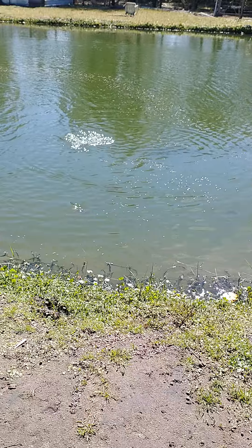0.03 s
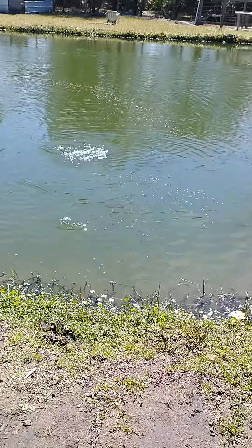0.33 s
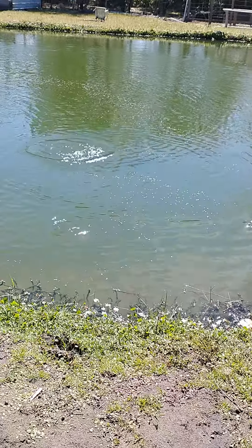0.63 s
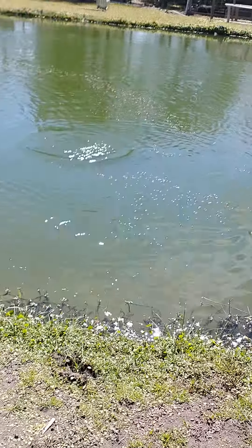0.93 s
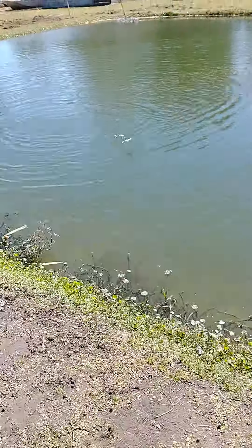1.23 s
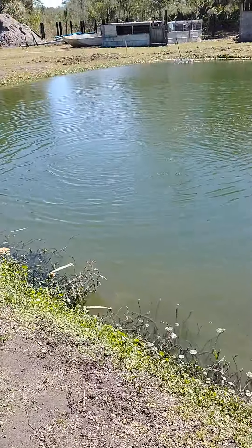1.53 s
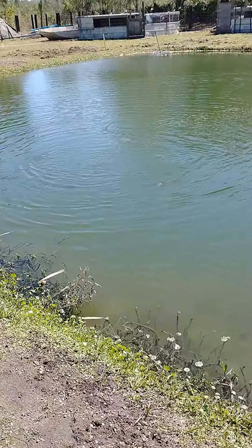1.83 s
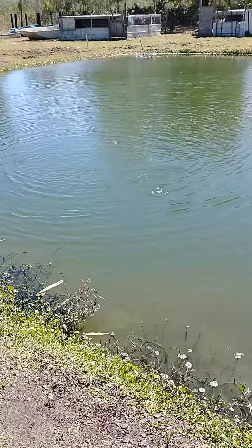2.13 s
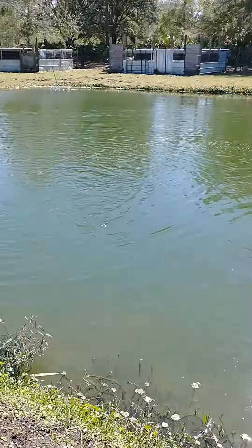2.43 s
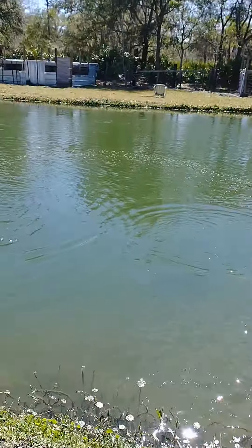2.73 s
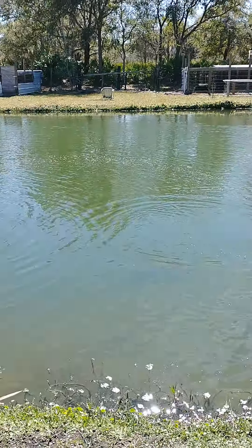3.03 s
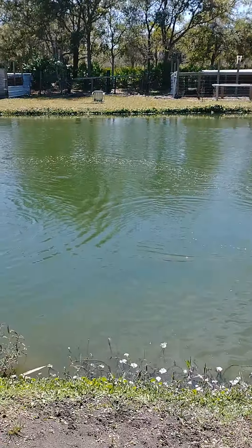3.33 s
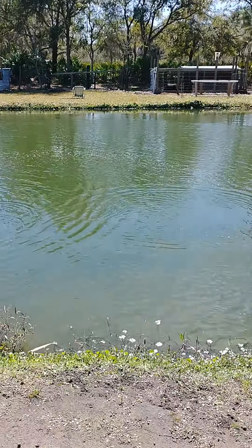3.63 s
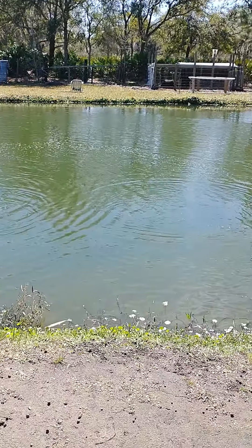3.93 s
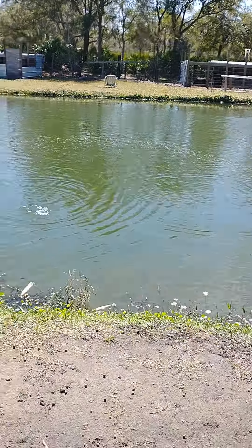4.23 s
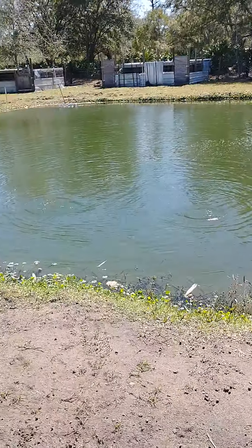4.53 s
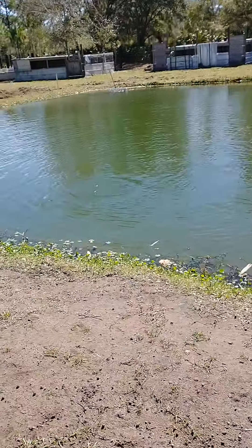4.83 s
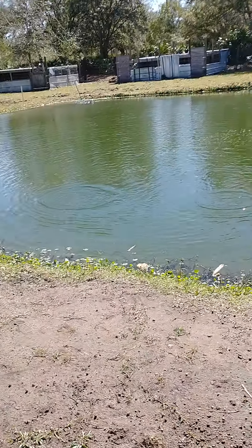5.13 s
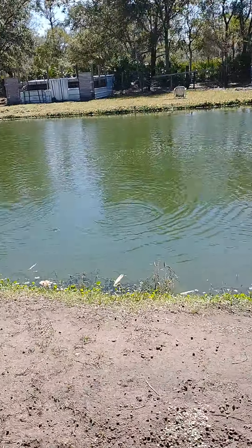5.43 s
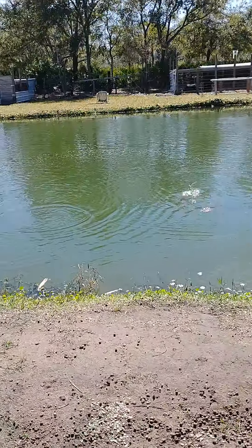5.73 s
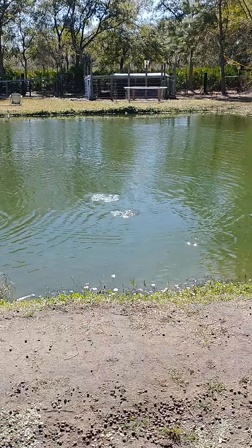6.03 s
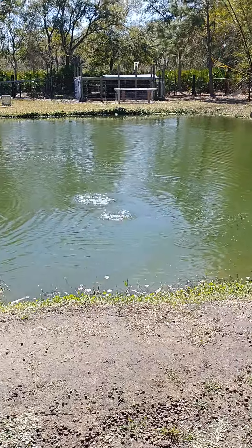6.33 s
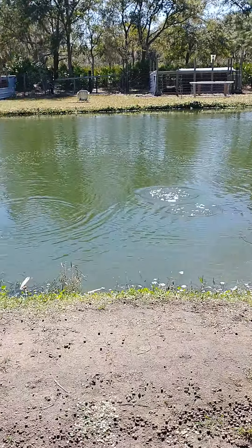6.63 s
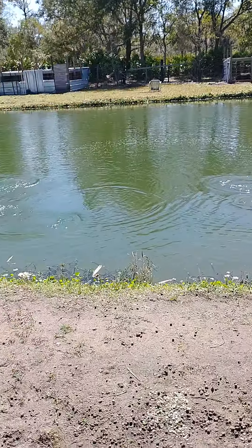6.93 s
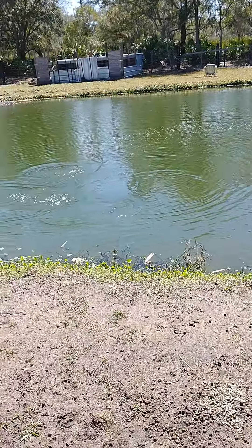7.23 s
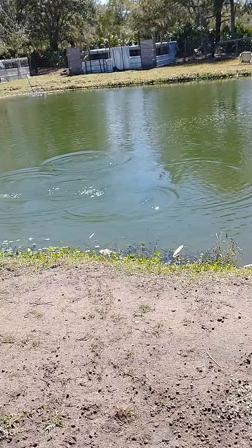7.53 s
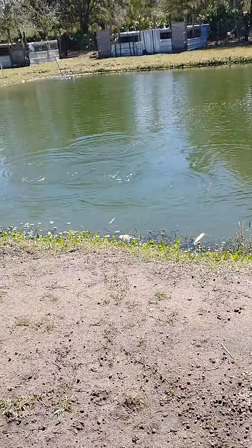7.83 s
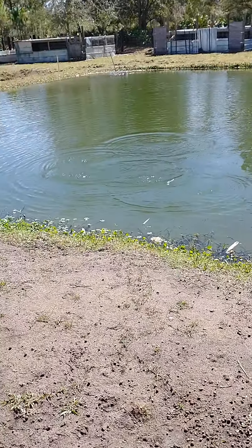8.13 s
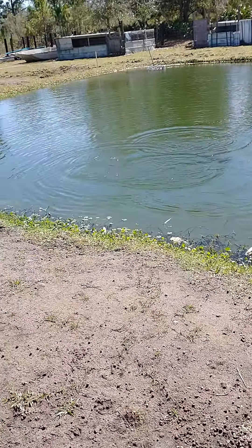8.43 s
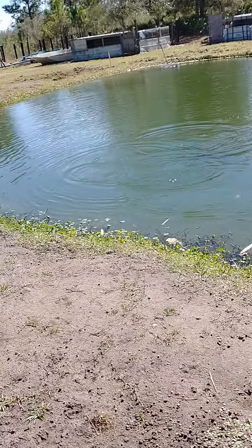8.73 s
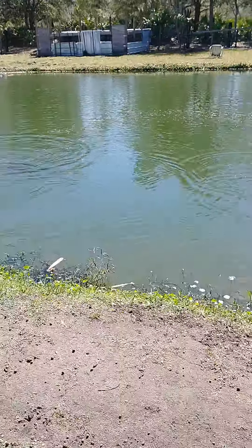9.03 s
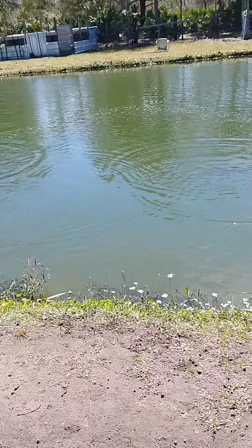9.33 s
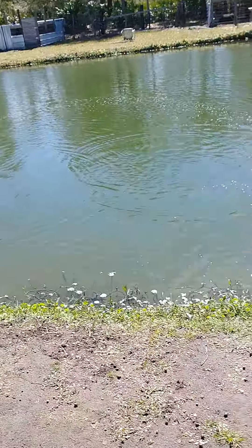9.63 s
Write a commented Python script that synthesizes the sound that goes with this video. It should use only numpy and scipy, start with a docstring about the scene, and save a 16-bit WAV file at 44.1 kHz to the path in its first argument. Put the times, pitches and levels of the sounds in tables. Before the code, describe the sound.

A finger bumps the microphone over low breeze rumble and a fading faraway truck, while feeding fish softly plop in a pond.

```python
"""Feeding fish, heard from the bank of a pond on a stereo microphone. From the start a diesel truck drones
on a distant road, beating against a far pump, under traffic roar and a light breeze. Fish and pellets splash.
Close by, something like keys clinks, a twig snaps and shoes scuff; wind thumps the microphone, and at 1.2 s
a finger knocks and slides over its left port. From 2 s tyres sing as cars go by and the slowing truck fades.
Faint insects come up, and the fish feed most busily around 5.7 s."""
import sys
import numpy as np
from scipy import signal
from scipy.fft import rfft, irfft
from scipy.io import wavfile
from scipy.ndimage import uniform_filter1d

SR = 44100
rng = np.random.default_rng(int(sys.argv[2]) if len(sys.argv) > 2 else 0)


def master_out(mix):
    """Clip the mix to full scale and print it as 16-bit PCM to the path in sys.argv[1]."""
    frames = np.transpose(np.atleast_2d(mix))
    ceiling = np.clip(frames, -1, 1)
    pcm = np.round(ceiling * 32767).astype(np.int16)
    wavfile.write(sys.argv[1], SR, pcm)


N = 426888
T = np.arange(N) / SR
BAND_LIMIT_HZ = 15900


def gain_of(db):
    """Decibels to amplitude."""
    return 10 ** (np.asarray(db) / 20)


def unit_rms(x):
    """Scales to rms 1."""
    return x / np.sqrt(np.mean(x ** 2) + 1e-20)


def at_hz(points, hz):
    """A spectrum's value at hz, on a log-frequency axis."""
    f, value = np.transpose(points)
    return np.interp(np.log(hz + 1), np.log(f), value)


def follow(rows, t=T):
    """Each column of a curve at the times t."""
    s, *columns = np.transpose(rows)
    return [np.interp(t, s, c) for c in columns]


def place(mix, start_s, sound, left_db):
    """Adds a sound to the mix, left_db louder on the left than on the right."""
    part = mix[:, round(start_s * SR):][:, :sound.shape[-1]]
    part += (sound * gain_of([[left_db / 2], [-left_db / 2]]))[:, :part.shape[1]]


def drift(rate_hz):
    """Slow random wandering of rms 1."""
    f = np.fft.rfftfreq(N, 1 / SR)
    return unit_rms(irfft(rfft(rng.standard_normal(N)) * np.exp(-(f / rate_hz) ** 2), N))


def coloured(x, spectrum):
    """Gives x a spectrum, at rms 1."""
    size = x.shape[-1]
    return unit_rms(irfft(rfft(x) * gain_of(at_hz(spectrum, np.fft.rfftfreq(size, 1 / SR))), size))


# How alike open air sounds at the microphone's two ports: freq_hz, likeness_ratio
PORT_LIKENESS = [(60, 1), (290, 0.88), (640, 0.73), (1400, 0.46), (3100, 0), (16000, 0)]
# How much louder it is at the left port: freq_hz, left_db
PORT_BALANCE = [(60, .6), (200, 1.5), (700, 1), (1300, 3), (4000, 1.5), (15000, 1.8)]

def diffuse_noise(shape_db, patchy_db, size=1024):
    """Noise from all around the microphone, rms 1, with drifting patches; its spectrum is shape_db(t, hz)."""
    hop = size // 4
    t, hz = np.arange(N // hop + 5)[:, None] * hop / SR, np.fft.rfftfreq(size, 1 / SR)
    a, b, c, d, patches = rng.standard_normal((5, len(t), len(hz)))
    likeness = np.clip(at_hz(PORT_LIKENESS, hz), -1, 1)
    left = a + 1j * b
    right = likeness * left + np.sqrt(1 - likeness ** 2) * (c + 1j * d)
    shape = gain_of(shape_db(t, hz) + np.zeros_like(t))
    shape /= np.linalg.norm(shape, axis=1, keepdims=True)
    patches = unit_rms(uniform_filter1d(uniform_filter1d(patches, size=8, axis=0), size=8, axis=1))
    lean = gain_of(at_hz(PORT_BALANCE, hz) / 2)
    spectra = np.array([left * lean, right / lean]) * shape * gain_of(patchy_db * patches)
    return unit_rms(signal.istft(spectra.swapaxes(1, 2), nperseg=size, noverlap=size - hop)[1][:, :N])


def engine_tones(turns, orders, waver):
    """Multiples of an engine's cycle, each fading in and out on its way to the microphone."""
    out = np.zeros(N)
    for order, db in orders:
        path = 1 + waver * (drift(2) + 1j * drift(2.4))
        out += gain_of(db) * (path * np.exp(2j * np.pi * (round(order) * turns + rng.random()))).real
    return out


# The truck slowing; once below the pump's tone, it beats ever faster against it: time_s, firing_hz
TRUCK_FIRING = [(0.0, 72.19), (1.3, 70.86), (2.3, 70.34), (3.4, 69.11), (4.2, 68.6), (4.9, 66.25),
                (6.1, 66.21), (7.1, 63.83), (7.7, 63.82), (8.5, 62.45), (9.68, 61.97)]
# Its drone as it reaches the bank: time_s, level_db
TRUCK_LEVEL = [(0, -30), (.4, -36), (.7, -40.5), (1.1, -36), (1.3, -40.5), (1.65, -34.5), (1.95, -45.5),
               (2.25, -42.5), (2.6, -53.5), (2.8, -43), (3.05, -49), (3.6, -43), (4.3, -45.5), (5, -60),
               (6, -58.5), (7.5, -59), (8.5, -59.5), (9.68, -71)]
# Its overtones: cycle_multiple, relative_db
TRUCK_OVERTONES = [(9, -12.5), (12, -14), (16, -23.5), (18, -20.5)]

def truck(cylinders=6, overtones_db=2, port_skew_rad=.087, waver_db=.83):
    """A diesel on the distant road: a wavering firing tone, a little out of step between the ports."""
    cycles = np.cumsum(follow(TRUCK_FIRING)[0]) / SR / cylinders
    skew = port_skew_rad * drift(3) * np.array([[1], [-1]])
    drone = np.sqrt(2) * np.sin(2 * np.pi * cylinders * cycles + skew)
    sound = drone + gain_of(overtones_db) * engine_tones(cycles, TRUCK_OVERTONES, waver=.26)
    return sound * gain_of(follow(TRUCK_LEVEL)[0] + waver_db * drift(4.1)) * gain_of([[.3], [-.3]])


# The pump engine's steady running: time_s, shaft_hz
PUMP_SHAFT = [(0.0, 23.229), (4.2, 22.943), (5.2, 22.949), (6.5, 23.049), (8.0, 22.928), (9.68, 22.969)]
# Its overtones: shaft_multiple, relative_db
PUMP_OVERTONES = [(8, -12), (9, -4.5), (10, -7), (11, -2.5), (12, -3), (13, 0.5), (14, 1), (15, -3),
                  (16, -11.5), (17, -6), (21, -7)]
# Those overtones together, from across the water: time_s, level_db
PUMP_OVERTONE_LEVEL = [(.25, -45.5), (1.8, -53.5), (2.8, -58.5), (3.4, -61.5), (4.2, -49.5), (5.2, -62.5),
                       (7, -60.5), (9.68, -61)]

def pump(firings_per_turn=3, firing_db=-59.5, fade_db_per_s=.6, waver_db=1):
    """An engine far beyond the pond: a slowly fading firing tone under a comb of low overtones."""
    turns = np.cumsum(follow(PUMP_SHAFT)[0]) / SR
    comb = unit_rms(engine_tones(turns, PUMP_OVERTONES, waver=.3))
    comb *= gain_of(follow(PUMP_OVERTONE_LEVEL)[0])
    firing = np.sqrt(2) * np.sin(2 * np.pi * firings_per_turn * turns)
    firing *= gain_of(firing_db - fade_db_per_s * T + waver_db * drift(1.8))
    return (firing + comb) * gain_of([[.5], [-.5]])


# The traffic's roar as it reaches the bank: time_s, level_db
ROAR_LEVEL = [(.25, -43), (1.5, -42), (1.9, -43.5), (2.2, -48), (3.2, -52.5), (3.7, -51), (4.1, -49),
              (4.7, -49.5), (5.4, -56), (6.7, -51.5), (7.3, -53.5), (8, -56), (8.9, -54), (9.68, -58.5)]
# Its spectrum at that distance: freq_hz, relative_db
ROAR_SPECTRUM = [(150, -38), (300, -0.5), (420, -1), (700, 2.5), (1000, -0.5), (1400, -6.5), (2000, -14.5),
                 (2800, -22.5), (3400, -37), (6000, -52.5), (12000, -59)]

def road(pulse_depth=.12, flutter_db=.32):
    """Distant roar and tyre song, pulsing with the truck's firing and fluttering in the moving air."""
    roar = diffuse_noise(lambda t, hz: at_hz(ROAR_SPECTRUM, hz), patchy_db=1.4)
    traffic = roar * gain_of(follow(ROAR_LEVEL)[0]) + tyres()
    pulse = 1 + pulse_depth * np.sin(2 * np.pi * np.cumsum(follow(TRUCK_FIRING)[0]) / SR)
    return traffic * pulse * gain_of(flutter_db * drift(25))


# Low rumble of wind and road at the bank: time_s, level_db
RUMBLE_LEVEL = [(.3, -37.5), (.55, -38.5), (.8, -42), (1.15, -38), (1.5, -46), (1.75, -40.5), (2.5, -48),
                (3.45, -49), (3.95, -45), (4.7, -45), (5.2, -50.5), (5.7, -54), (6.7, -54), (7.5, -56),
                (8.7, -58.5), (9.68, -61)]
# Its spectrum: freq_hz, relative_db
RUMBLE_SPECTRUM = [(20, -31.5), (40, -19), (60, -10), (100, 3), (140, -4.5), (200, -3.5), (260, -8.5),
                   (320, -5.5), (400, -17.5), (600, -30.5), (1200, -61)]

def rumble(trim_db=-2, gust_db=1.15):
    """Wind and road rumble around the microphone in quick, shallow gusts."""
    noise = diffuse_noise(lambda t, hz: at_hz(RUMBLE_SPECTRUM, hz), patchy_db=.5, size=2048)
    return noise * gain_of(follow(RUMBLE_LEVEL)[0] + trim_db + gust_db * drift(rate_hz=7))


# Airy hiss of grass and leaves around the pond: time_s, level_db
LEAVES_LEVEL = [(.25, -64), (1.1, -61.5), (1.8, -66.5), (2.2, -70.5), (4.5, -73.5), (6.6, -74), (7.7, -75),
                (9.68, -73)]
# Its spectrum: freq_hz, relative_db
LEAVES_SPECTRUM = [(1000, -18), (2500, 5), (3400, 1.5), (5200, -0.5), (6300, -2), (8000, -4.5),
                   (10000, -7.5), (13000, -9.5), (16000, -14)]

def leaves(dulling=.66, calm_db=-71):
    """Grass and leaves hiss, louder early on while the truck's roar is near; the extra hiss lies mostly below
    the top octave."""
    def shape_db(t, hz):
        swell_db = np.maximum(follow(LEAVES_LEVEL, t)[0] - calm_db, 0)
        return at_hz(LEAVES_SPECTRUM, hz) - dulling * swell_db * np.log2(np.maximum(hz / 8000, 1))
    return diffuse_noise(shape_db, patchy_db=2.8, size=512) * gain_of(follow(LEAVES_LEVEL)[0])


def bubble(age, hz, ring_cycles):
    """A pocket of air that swells in about a cycle and rings down."""
    turns = hz * np.maximum(age, 0)
    return np.sin(2 * np.pi * turns) * (1 - np.exp(-turns)) ** 2 * np.exp(-turns / ring_cycles)


def splash(length_s, centre_hz, drops_per_s=450, pitch_spread=.31, spray_gain=.7):
    """A slap of spray, and a cluster of droplets that each ring for a few cycles."""
    t = T[:SR // 6]
    count = 2 + int(drops_per_s * length_s)
    delay = length_s * (np.arange(count) + rng.random(count)) / count
    size = rng.uniform(.33, 1, count)
    hz = np.minimum(centre_hz * np.exp(pitch_spread * rng.standard_normal(count)), BAND_LIMIT_HZ)
    port_gains = size * np.exp(-delay / length_s) * rng.uniform(.37, 1, (2, count))
    drops = port_gains @ bubble(t - (delay - delay[0])[:, None], hz[:, None], ring_cycles=4.5)
    spectrum = [(centre_hz * ratio, db) for ratio, db in [(1 / 6, -22), (.5, -3), (1, 0), (1.7, -9), (3, -26)]]
    spray = coloured(rng.standard_normal((2, len(t))), spectrum) * np.exp(-t / length_s)
    return unit_rms(unit_rms(drops) + spray_gain * unit_rms(spray)) * np.sqrt(length_s / t[-1])


def patter(middle_s, span_s, db, length_s, count, low_hz=3300, range_hz=1900, width_db=6):
    """Tiny splashes scattered left and right over the water, at random times."""
    out = np.zeros((2, N))
    for when, softness, pitch, side in rng.random((count, 4)):
        start_s = max(middle_s + span_s * (when - .5), 0)
        sound = gain_of(db + .25 - softness) * splash(length_s, low_hz + range_hz * pitch)
        place(out, start_s, sound, width_db * (side - .5))
    return out


# Larger splashes of fish and pellets, off the bank: start_s, level_db, length_s, centre_hz
SPLASHES = [(0.288, -61, 0.013, 5630), (.912, -54, .025, 2700), (1.695, -66, 0.011, 4600),
            (1.815, -62.5, 0.046, 3550), (2.77, -62, 0.013, 2400), (3.684, -58, 0.0045, 3870),
            (3.885, -64, 0.0053, 3900), (5.621, -72, 0.0068, 4600), (5.775, -71.5, .01, 5000),
            (5.821, -63.5, 0.019, 5300), (6.243, -69, .022, 6050), (6.569, -68, .02, 5000),
            (6.71, -69, .022, 6140), (6.88, -67, .018, 2970), (6.905, -69, .034, 4800),
            (6.973, -66.5, .035, 5000), (7.634, -71.5, .009, 4000), (9.648, -67.5, .01, 3980)]
# Bubbles left by the larger gulps: start_s, level_db, pitch_hz
GULP_BUBBLES = [(3.795, -57, 2125), (5.822, -45, 1510), (5.826, -52, 2270), (5.835, -51, 2004),
                (5.926, -50.5, 1746), (6.088, -52, 2060), (6.65, -53, 2490), (6.974, -52, 2170),
                (6.984, -51, 2070), (7.017, -49.5, 2180), (8.928, -59.5, 2170), (9.38, -63, 2350)]

def feeding(splash_trim_db=-1, rise_per_s=4):
    """Fish and pellets break the water; each bubble climbs in pitch as it nears the surface."""
    out = np.zeros((2, N))
    for start_s, db, length_s, hz in SPLASHES:
        place(out, start_s, gain_of(db + splash_trim_db) * splash(length_s, hz), left_db=1.5)
    age = T[:SR // 20]
    for start_s, db, hz in GULP_BUBBLES:
        plop = bubble(age, hz * (1 + rise_per_s * age), ring_cycles=10)
        place(out, start_s, gain_of(db) * plop, left_db=0)
    return out


def bank_echoes(x, echo_db=-14, t60_s=.3, echoes_per_s=1500):
    """A sound with its thin scatter of echoes from the banks and trees."""
    t = T[:SR // 3]
    taps = rng.standard_normal((2, len(t))) * (rng.random((2, len(t))) < echoes_per_s / SR)
    taps *= gain_of(-60 * t / t60_s) * (t > .004)
    return x + gain_of(echo_db) * signal.fftconvolve(x, taps / np.linalg.norm(taps[0]), axes=1)[:, :N]


# Small metal clinking close by, to the left: start_s, level_db, tilt_db_per_octave
CLINKS = [(.542, -58, -3), (2.21, -70, 6), (2.362, -71, 3), (2.880, -64, 9), (2.948, -69, 9),
          (2.967, -68, 7), (2.979, -62.5, -0.5), (3.052, -67, 15), (3.151, -62, 5), (3.174, -46.5, -2),
          (3.998, -69, 10), (5.226, -67, 10), (6.897, -66.5, 26), (9.285, -68.5, 19), (9.323, -65, 21)]
# The metal's modes when it rings freely: pitch_hz, relative_db, t60_s
METAL_MODES = [(3075, -4.5, 0.18), (4830, -11, .05), (5720, -12, .014), (7460, -1.5, 0.13),
               (9270, -4, .035), (14340, -6, 0.059)]
# The tick of its strike: freq_hz, relative_db
TICK_SPECTRUM = [(1500, -22), (3000, -2), (4500, 4), (7000, 5), (10000, -8), (16000, -11)]

def keys(tick_db=2, tick_t60_s=.025, strike_s=.00034, free_db=-50, damping=.13):
    """Each touch ticks and rings the same metal; the further below free_db, the sooner it is damped."""
    out, t = np.zeros((2, N)), T[:SR // 4]
    for start_s, db, tilt in CLINKS:
        freedom = gain_of(damping * min(db - free_db, 0))
        ring = np.zeros((2, len(t)))
        for hz, mode_db, t60_s in METAL_MODES:
            envelope = gain_of(mode_db + tilt * np.log2(hz / 9000) - 60 * t / (t60_s * freedom))
            ring += envelope * np.sin(2 * np.pi * (hz * t + rng.random((2, 1))))
        tick = coloured(rng.standard_normal((2, len(t))), TICK_SPECTRUM)
        tick *= gain_of(tick_db - 60 * t / tick_t60_s)
        place(out, start_s, gain_of(db) * (ring + tick) * (1 - np.exp(-t / strike_s)), left_db=6)
    return out


# A dry twig underfoot: start_s, level_db, t60_s
SNAPS = [(0.724, -35, 0.015), (0.728, -40, .014)]
# Its spectrum: freq_hz, relative_db
SNAP_SPECTRUM = [(500, -15), (1500, 10.5), (3000, 5.5), (5800, 2), (8000, -16), (12000, -11), (16000, -22)]
# Scuffs on the bank's dry dirt: middle_s, level_db, length_s, left_db, tilt_db_per_octave
SCUFFS = [(.985, -65, .039, 6.5, 4), (3.604, -68.5, 0.051, 11, -5.5), (4.154, -59, 0.058, 6, -5.5),
          (4.219, -70, 0.12, 6, -2), (4.458, -67, .18, 8, -2), (4.657, -63, 0.096, 3.5, -15),
          (4.859, -63.5, 0.087, 12, -3), (6.293, -63, .08, 1, -3), (8.398, -73, .06, 3.5, 6),
          (8.675, -69.5, .045, 6.5, 2), (9.196, -69, .12, 1, -5)]
# Their spectrum before the treble is tilted: freq_hz, relative_db
SCUFF_SPECTRUM = [(500, -12), (2000, 4.5), (4000, -1.5), (7500, -4), (11000, -10.5), (16000, -16)]

def shoes(grit=.99):
    """Near the microphone a twig snaps, and soles drag over grit in short swells of grainy noise."""
    out, t = np.zeros((2, N)), T[:SR // 30]
    for start_s, db, t60_s in SNAPS:
        crack = coloured(rng.standard_normal((2, len(t))), SNAP_SPECTRUM)
        place(out, start_s, gain_of(db - 60 * t / t60_s) * crack, left_db=4)
    for middle_s, db, length_s, left_db, tilt in SCUFFS:
        size = int(length_s * SR)
        grains = rng.standard_normal((2, size)) * np.exp(grit * rng.standard_normal(size))
        spectrum = [(hz, level + tilt * np.log2(max(hz, 2500) / 2500)) for hz, level in SCUFF_SPECTRUM]
        scuff = coloured(grains, spectrum) * signal.windows.tukey(size, .7)
        place(out, middle_s - length_s / 2, gain_of(db) * scuff, left_db)
    return out


# Wind right on the microphone: middle_s, level_db, length_s, centre_hz
BUFFETS = [(.96, -42, 0.055, 129), (2.528, -45.5, 0.0606, 121), (2.94, -48, 0.0782, 110),
           (4.219, -39.5, .09, 90), (4.771, -44.5, 0.047, 120), (4.95, -43, 0.091, 130)]

def wind_buffets():
    """Small eddies thump softly on both ports."""
    out = np.zeros((2, N))
    for middle_s, db, length_s, hz in BUFFETS:
        size = int(length_s * SR)
        eddy = coloured(rng.standard_normal(size), [(hz / 3, -25), (hz, 0), (hz * 2, -20), (hz * 12, -70)])
        place(out, middle_s - length_s / 2, gain_of(db) * eddy * signal.windows.hann(size), left_db=1)
    return out


# A finger sliding over the left port: time_s, level_db, tilt_db_per_octave
FINGER_SLIDE = [(1.154, -49, 0), (1.161, -38, -0.5), (1.168, -15, -3.5), (1.175, -12.5, -2.8),
                (1.186, -18, -0.2), (1.2, -21.5, -0.3), (1.209, -31, -1), (1.222, -36, -4.5),
                (1.238, -65, 2)]
# The rub's spectrum before that tilt: freq_hz, relative_db
RUB_SPECTRUM = [(30, -20.5), (120, -2.5), (600, -9.5), (1200, 1), (2000, -6), (3300, -11.5), (5000, -9),
                (7000, -5), (10000, -12), (13000, -17), (16000, -25.5)]
# The finger landing: start_s, level_db, pitch_hz, t60_s
FINGER_BLOWS = [(1.1672, -10, 120, .03), (1.169, -4.5, 520, .008), (1.1713, -6.5, 900, .006)]

def finger(right_leak_db=-38):
    """Handling noise: a finger lands on the left port with dull blows and rubs off with a brighter hiss."""
    t = np.arange(round(FINGER_SLIDE[0][0] * SR), round(FINGER_SLIDE[-1][0] * SR)) / SR
    age = T[:len(t)]
    level_db, tilt = follow(FINGER_SLIDE, t)
    rub = coloured(rng.standard_normal(len(t)), RUB_SPECTRUM)
    hz, frame_s, spectra = signal.stft(rub, SR, nperseg=128)
    spectra *= gain_of(np.interp(frame_s, age, tilt) * np.log2(np.maximum(hz, 400) / 2500)[:, None])
    rub = signal.istft(spectra, SR, nperseg=128)[1][:len(t)]
    rub /= np.sqrt(uniform_filter1d(rub ** 2, size=300) + 1e-12)  # the tilt changes only the colour
    out = np.zeros((2, N))
    place(out, t[0], rub * gain_of(level_db), left_db=0)
    for start_s, db, hz, t60_s in FINGER_BLOWS:
        place(out, start_s, -gain_of(db - 60 * age / t60_s) * np.sin(2 * np.pi * hz * age), left_db=0)
    return out * gain_of([[0], [right_leak_db]])


# Cars going by on the distant road: loudest_s, level_db, half_length_s, pitch_hz, glide_octaves_per_s
CAR_PASSES = [(2.299, -57, 0.45, 1483, -.15), (3.07, -47.5, .07, 850, -.2), (3.3, -53, .2, 850, -.1),
              (4.054, -45.5, .16, 852, 0.54), (4.47, -50.5, 0.27, 1010, .3), (6.446, -56.5, .3, 824, .1),
              (6.781, -56.5, .16, 1065, -.3), (7.3, -58, .35, 889, 0.06), (8.656, -52, .16, 955.5, -.2),
              (9.015, -52.5, 0.098, 1239, .1)]

def tyres(trim_db=-1, width_octaves=.21):
    """Tyres sing in a band of noise: each car swells, glides and fades, and the loudest leads the pitch."""
    def power_and_pitch(t):
        loudest_s, db, half_s, hz, glide = np.transpose(CAR_PASSES)
        since = t[..., None] - loudest_s
        power = gain_of(db) ** 2 / (1 + (since / half_s) ** 2 / 2) ** 3
        pitch = hz * 2 ** (glide * np.clip(since, -1, 1))
        return power.sum(-1), (power * pitch).sum(-1) / power.sum(-1)

    def band_db(t, hz):
        octaves_off = np.log2((hz + 1) / power_and_pitch(t)[1])
        return -20 * np.log10(1 + (octaves_off / width_octaves) ** 2) - 12 * np.maximum(hz / 2000 - 1, 0)

    swell = np.sqrt(np.interp(T, T[::256], power_and_pitch(T[::256])[0]))
    return diffuse_noise(band_db, patchy_db=3.5) * gain_of(trim_db) * swell


# Insects around the pond: time_s, level_db
INSECT_LEVEL = [(3, -92), (5.5, -81.5), (9.68, -83.5)]
# Their spectrum: freq_hz, relative_db
INSECT_SPECTRUM = [(2500, -36), (3400, -15.5), (3900, -1.5), (4500, -8), (5150, -0.5), (5700, -14),
                   (7500, -35)]

def insects():
    """A thin chorus, heard from the bank as a faint, patchy hiss."""
    chorus = diffuse_noise(lambda t, hz: at_hz(INSECT_SPECTRUM, hz), patchy_db=3)
    return chorus * gain_of(follow(INSECT_LEVEL)[0])


def scene():
    """Everything heard from the bank; only the water and the shoes echo."""
    pellets = patter(middle_s=T[-1] / 2, span_s=T[-1], db=-77, length_s=.0037, count=60)
    nibbles = patter(middle_s=5.7, span_s=1.6, db=-76, length_s=.012, count=20)
    distant = truck() + pump() + road()
    around = rumble() + leaves() + insects()
    close = keys() + wind_buffets() + finger()
    return distant + around + close + bank_echoes(pellets + nibbles + feeding() + shoes())


def record(dry, open_s=.254, settle_s=.066, low_cut_hz=36):
    """The microphone cuts deep bass and top treble; it opens after a moment, its low end settling last."""
    dry = signal.sosfilt(signal.butter(4, low_cut_hz, "high", fs=SR, output="sos"), dry)
    low_end = signal.sosfiltfilt(signal.butter(2, 1500, fs=SR, output="sos"), dry)
    held_back = .78 * np.exp(-(np.maximum(T - open_s, 0) / settle_s) ** 2)
    opened = (dry - held_back * low_end) * np.clip((T - open_s) / .0012, 0, 1)
    band_limit = signal.firwin(511, BAND_LIMIT_HZ, window=("kaiser", 9), fs=SR)
    return signal.oaconvolve(opened, band_limit[None], "same")


dry = scene()
out = record(dry)
master_out(out)
```